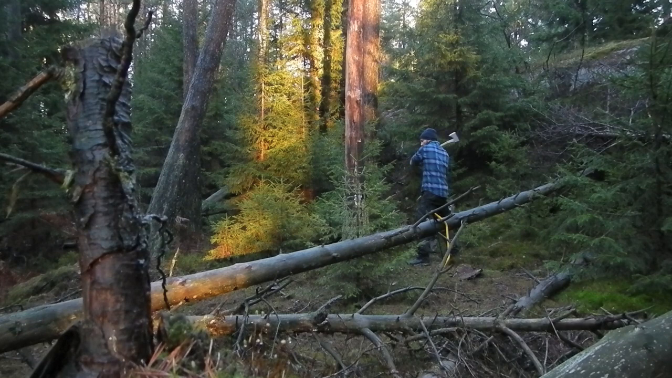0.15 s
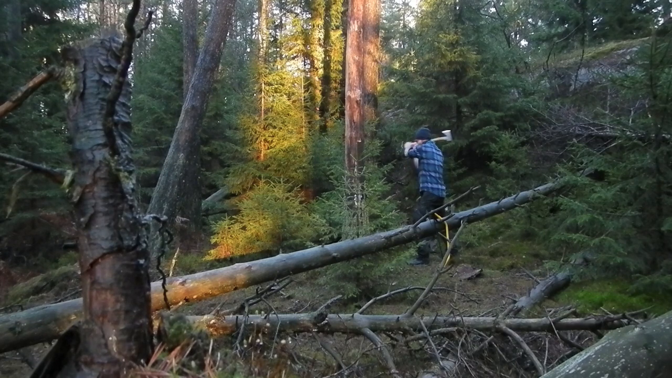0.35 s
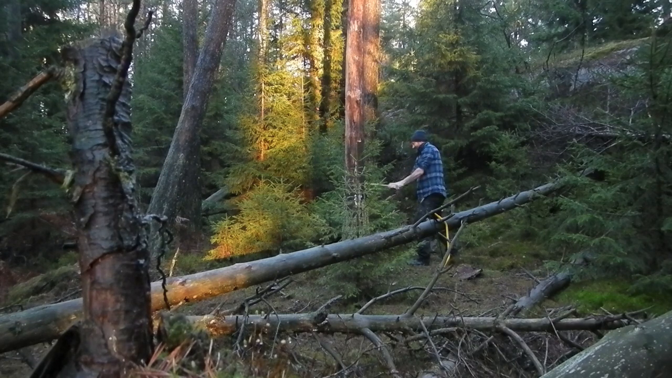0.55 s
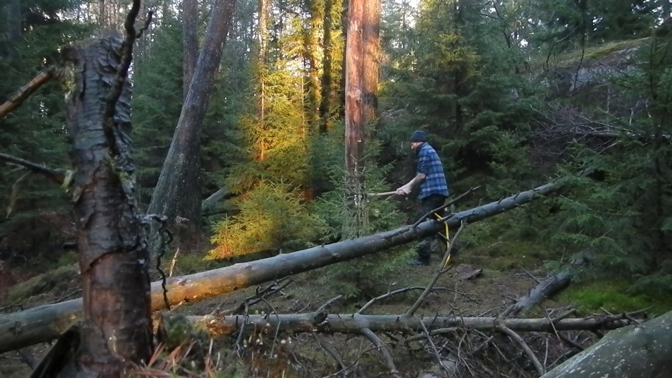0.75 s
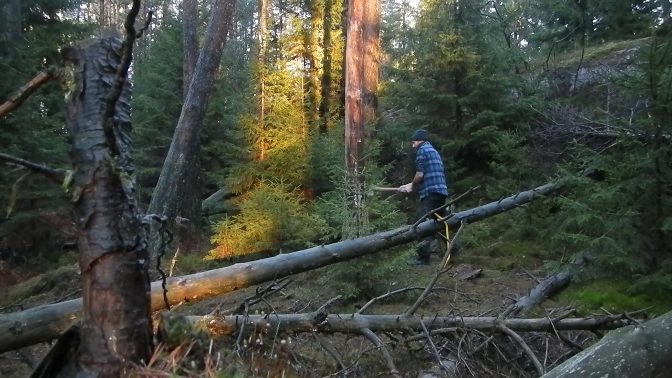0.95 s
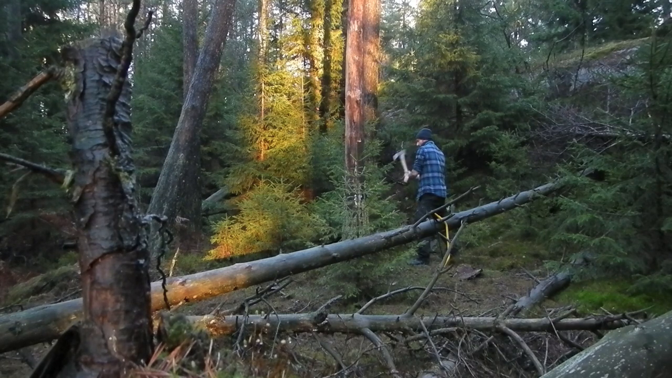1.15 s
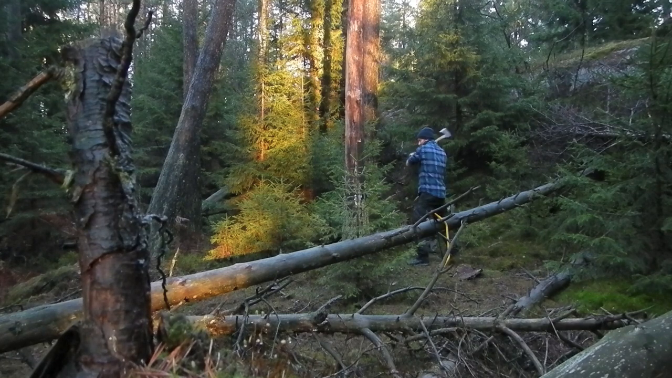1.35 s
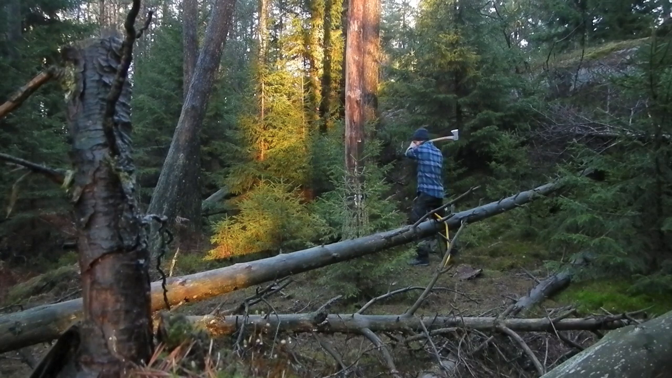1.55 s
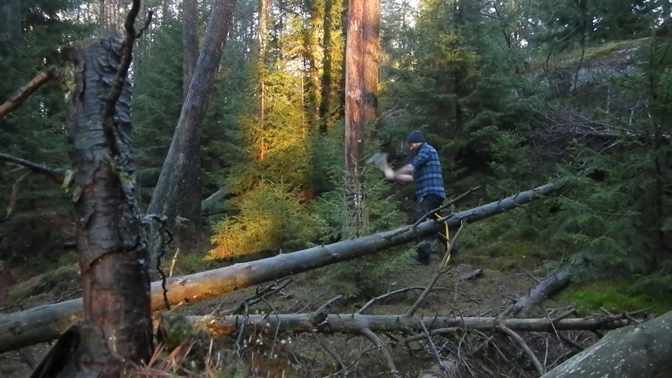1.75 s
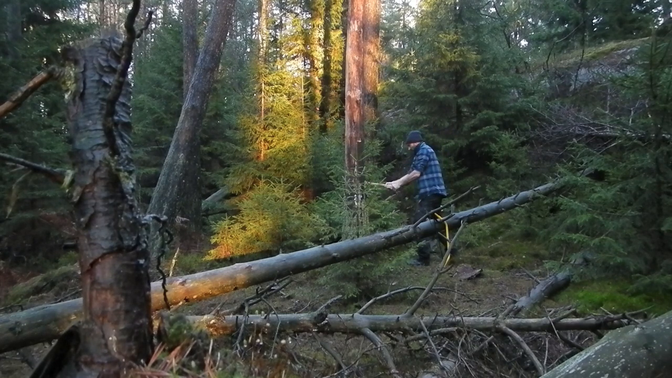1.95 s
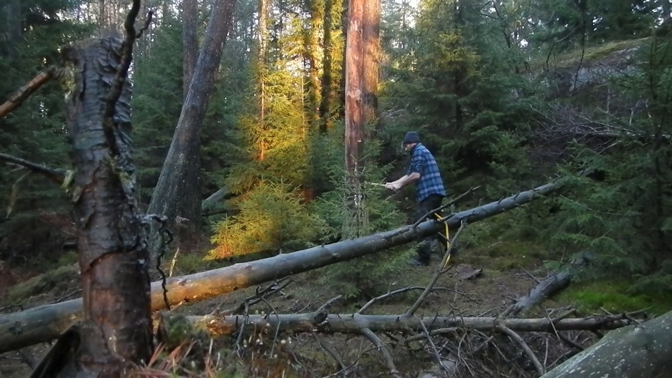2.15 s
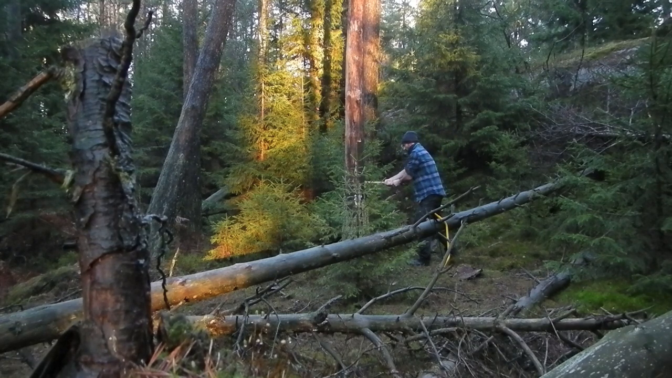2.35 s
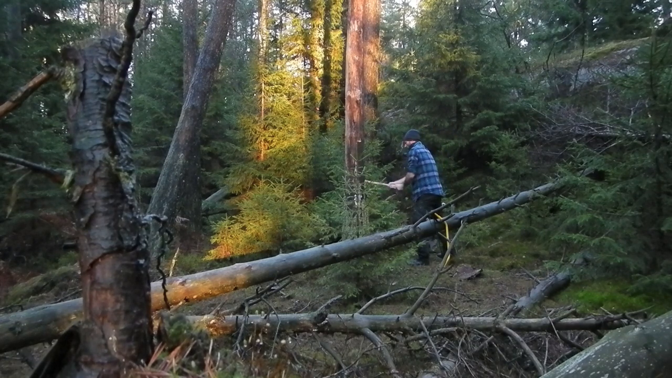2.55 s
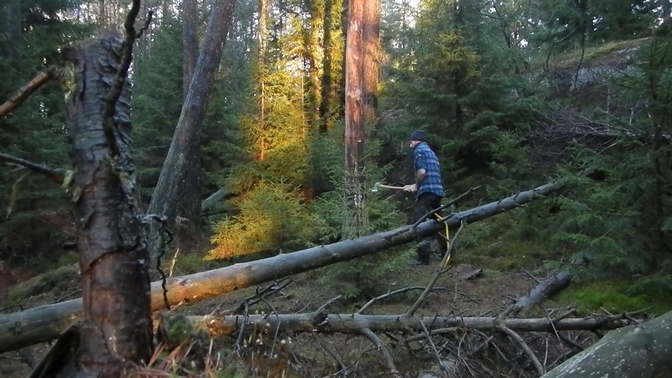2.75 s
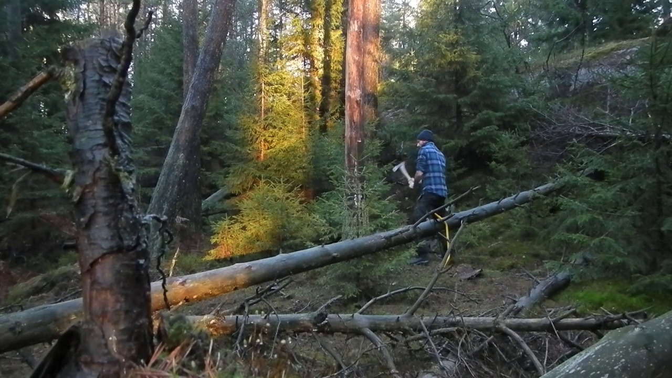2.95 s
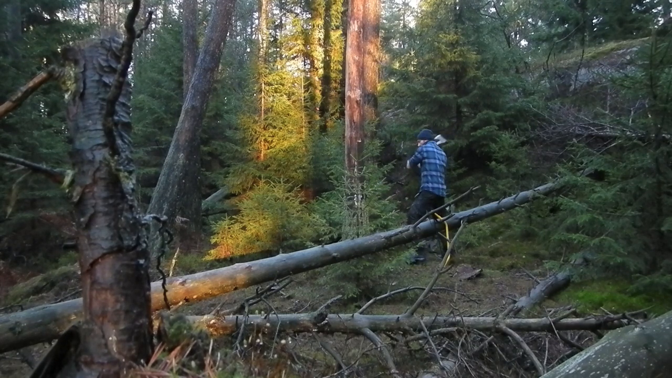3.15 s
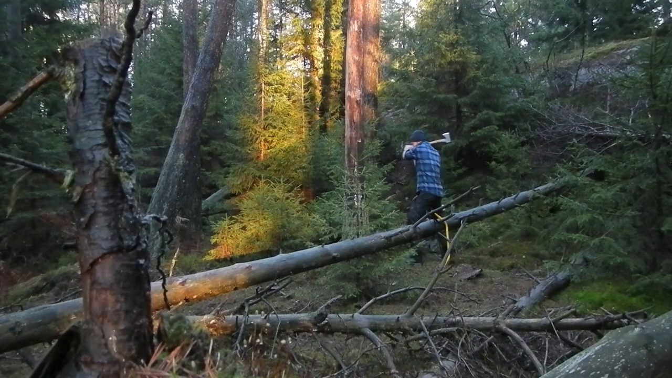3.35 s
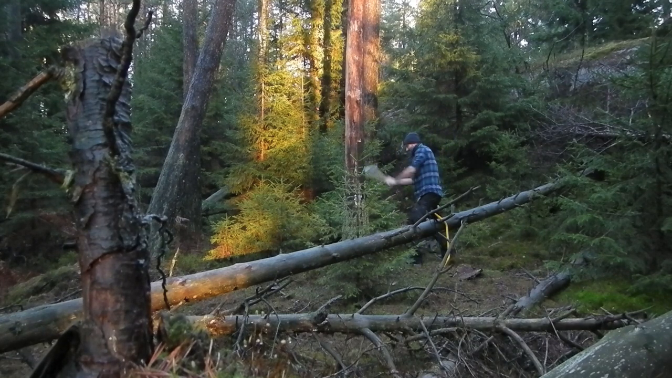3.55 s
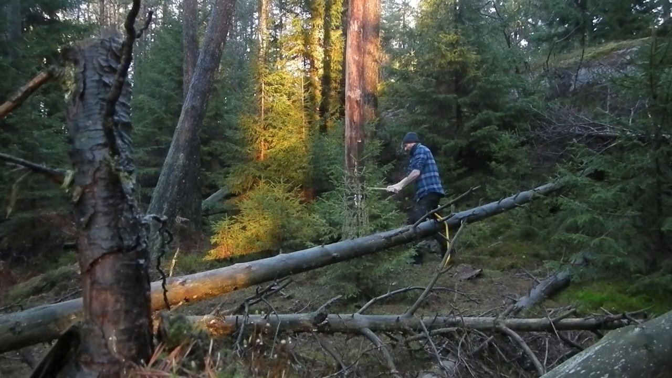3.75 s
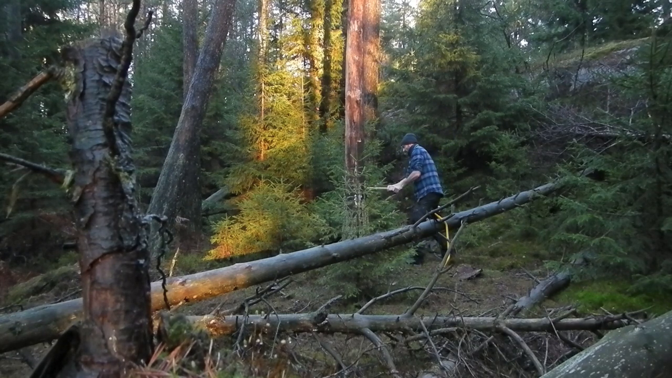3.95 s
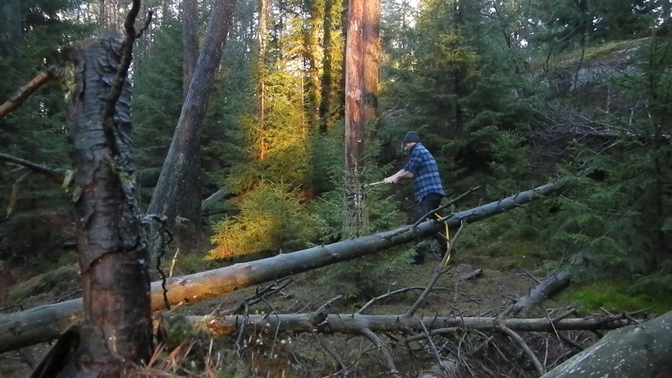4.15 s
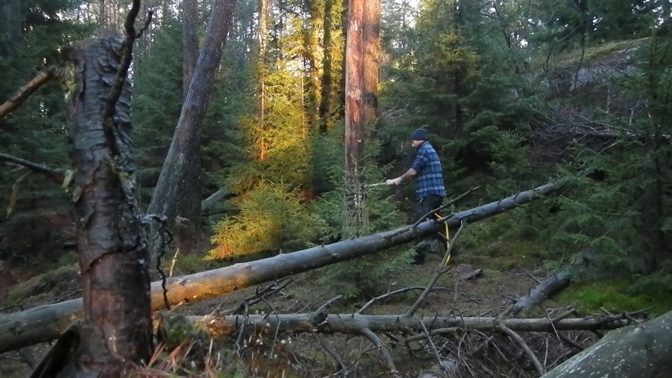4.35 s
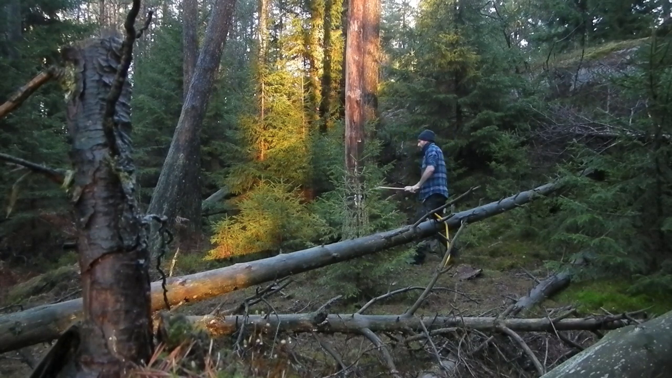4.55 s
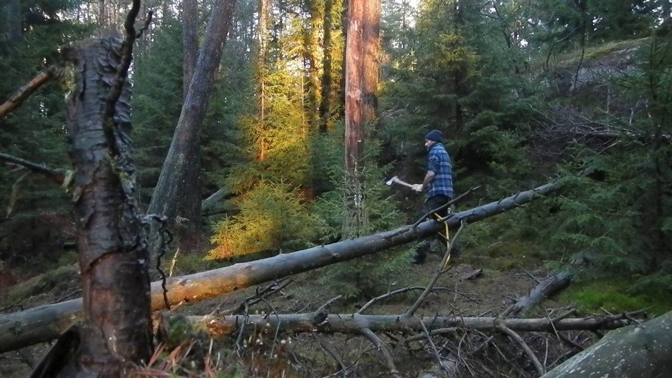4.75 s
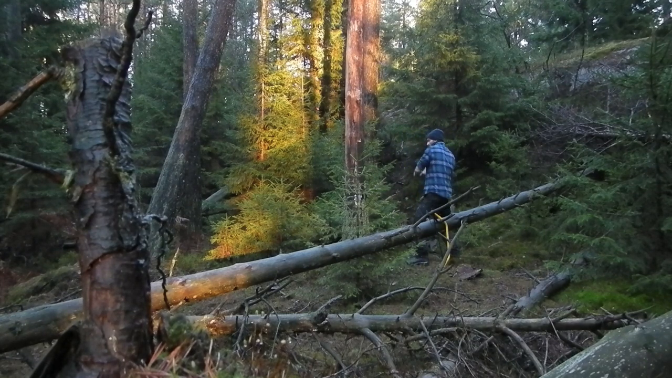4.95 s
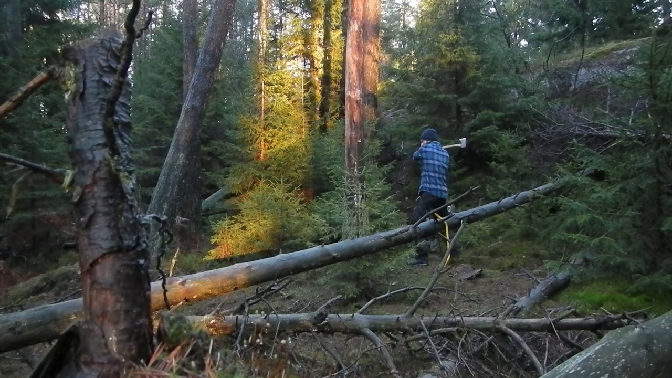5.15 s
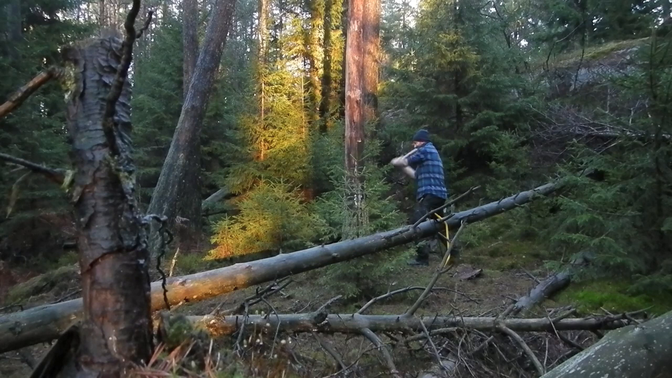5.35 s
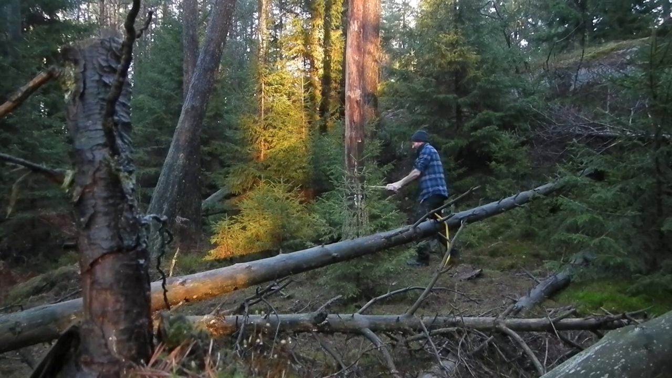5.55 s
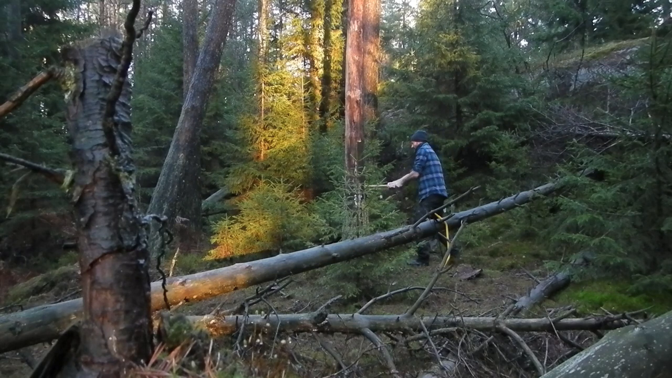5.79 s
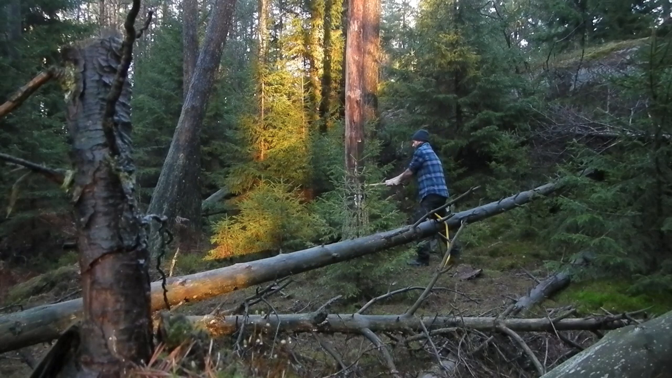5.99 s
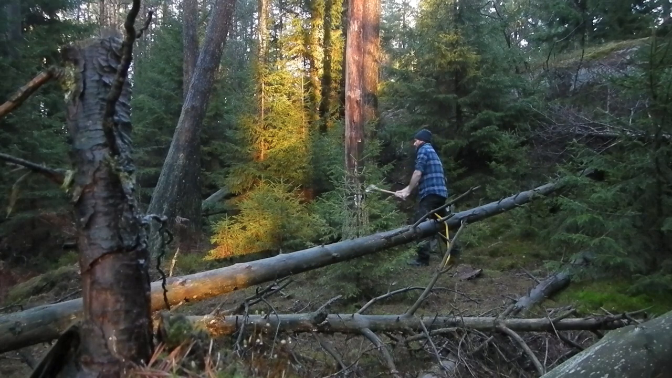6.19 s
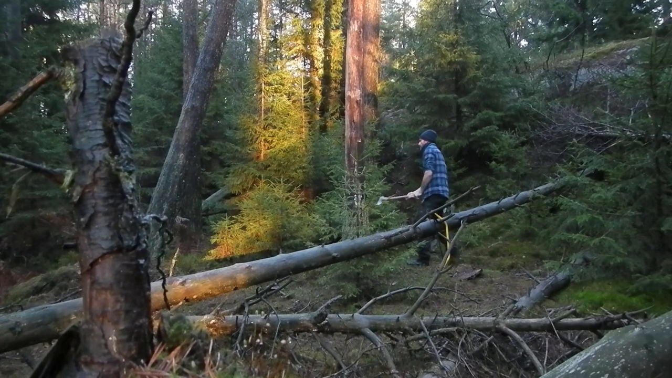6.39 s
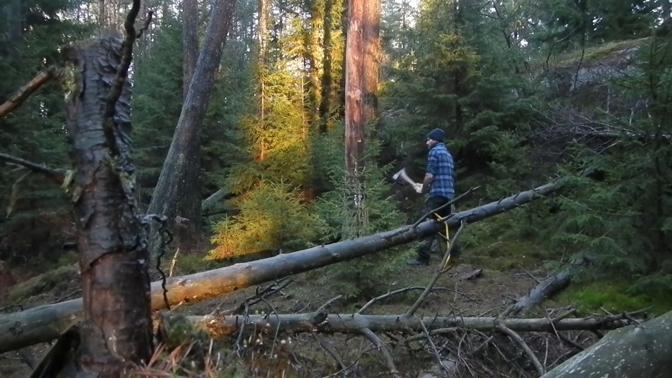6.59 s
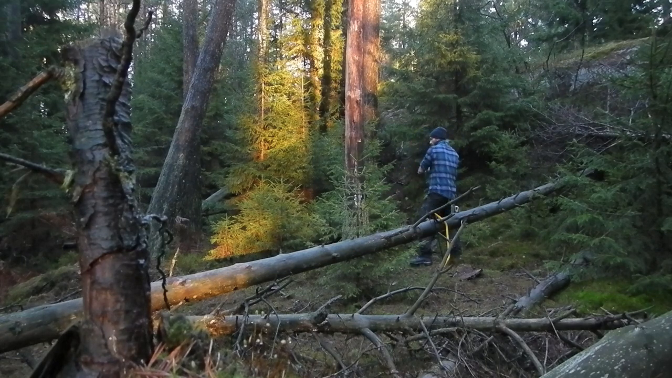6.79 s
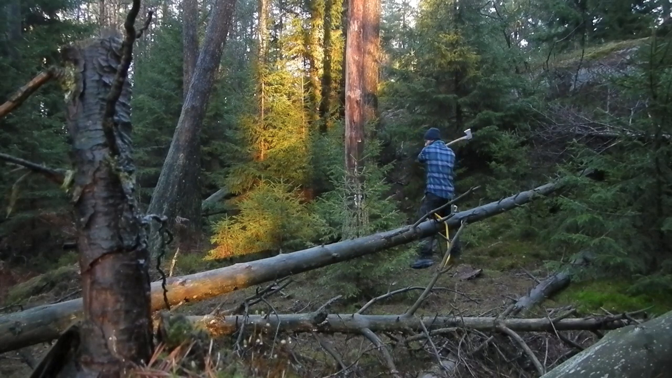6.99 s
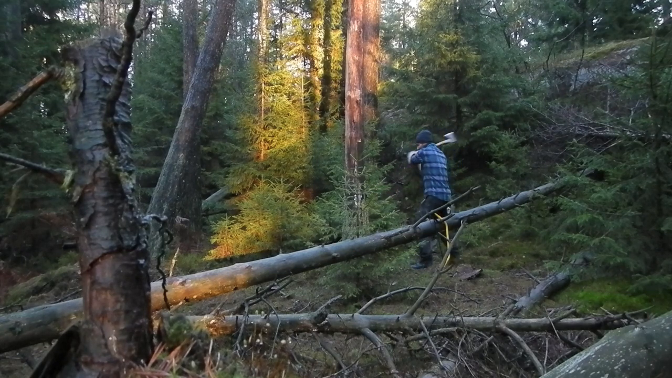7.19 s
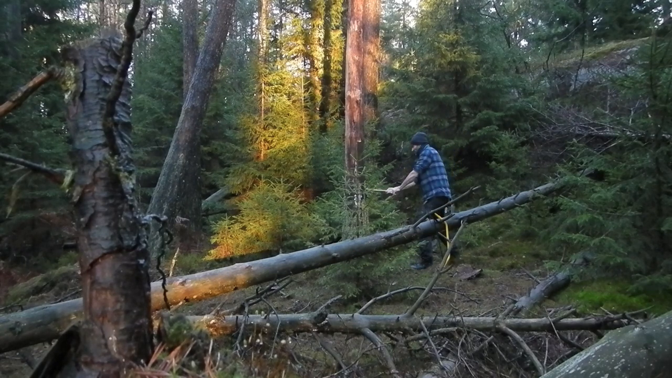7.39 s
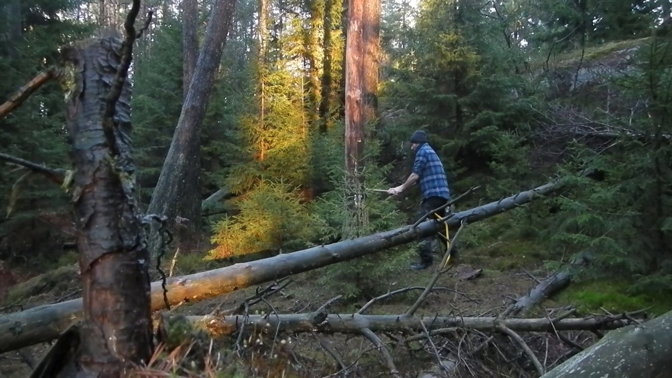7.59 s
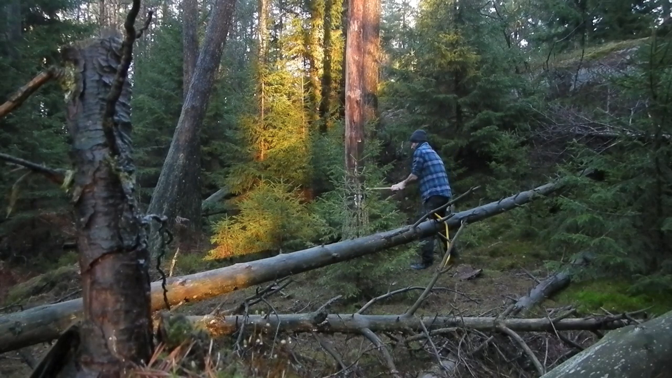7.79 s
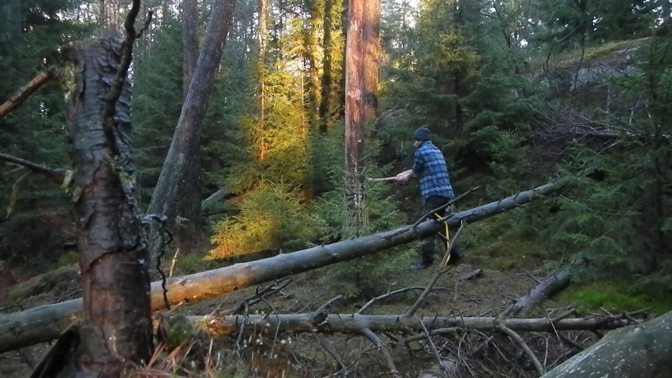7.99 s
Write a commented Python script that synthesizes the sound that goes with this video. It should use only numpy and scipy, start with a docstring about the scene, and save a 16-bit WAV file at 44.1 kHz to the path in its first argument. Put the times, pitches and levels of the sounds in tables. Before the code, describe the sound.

A quiet forest with low airy rumble, steady electronic hiss and a barely noticeable, very high whine. At about 0.55 s an axe hits a dry standing trunk with a loud, sharp crack: a few milliseconds of splintering, short hollow wood tones, a soft low thump and a dense echo dying among trees and slope. Small chips crackle just after, near 0.65 s. Very faint, hoarse rising hoots come from far off around 1.6 and 1.9 s. Further blows fall at 1.8 s, a brighter knock, and 3.6 s, with more distant hoots at 3.2 to 3.5 s. Tiny chip ticks follow. The blow at 5.5 s is strong, deeper and rings longest. The last, at 7.35 s, is somewhat weaker; at 7.76 s the blade creaks out with a tiny squeak leaping upward in pitch, then one faint chip. The work sits slightly left, heard from some distance.

```python
"""Five axe blows on a dry standing trunk in a quiet forest, falling chips, and a squeak as the blade is levered out.
Far away something hoots faintly; steady hiss, a thin whine and low forest air lie under everything.
Wood is a set of dying tones, splinters and chips are shaped noise, and the squeak is a train of slips.
Trunks and slope scatter the sounds as decaying noise; a limiter lowers loud peaks and recovers slowly."""
import sys
import numpy as np
from scipy import signal
from scipy.fft import rfft, irfft, next_fast_len
from scipy.io import wavfile
from scipy.ndimage import uniform_filter1d, minimum_filter1d

SR = 44100
rng = np.random.default_rng(int(sys.argv[2]) if len(sys.argv) > 2 else 0)


def output_pcm(signal):
    """Save a mono or channel-first signal as 16-bit PCM at the path in sys.argv[1].

    Samples are clipped to [-1, 1] before scaling.
    """
    pcm = np.clip(np.atleast_2d(signal).T, -1, 1) * 32767
    wavfile.write(sys.argv[1], SR, np.round(pcm).astype(np.int16))


N = 354123  # length of the scene in samples

# how alike left and right are in echoes and thumps: f/Hz, likeness (1 = identical)
ECHO_LIKENESS = [(100, 0.97), (1000, 0.89), (2500, 0.78), (5000, 0.3), (12000, 0.082)]

# the two lingering groups of trunk tones, and the time they take to fall by 60 dB
RING_HZ, UPPER_RING_HZ, RING_T60_S = 979, 1472, 1.24


def amp(db):
    """Turn decibels into a gain."""
    return 10 ** (np.asarray(db) / 20)


def unit(x):
    """Scale a sound to an rms of 1."""
    return x / np.sqrt(np.mean(x ** 2) + 1e-20)


def fade(t, t60):
    """Die away by 60 dB in t60 seconds."""
    return amp(-60 * t / t60)


def swell(t, rise_s):
    """Rise smoothly from 0 towards 1."""
    return 1 - np.exp(-t / rise_s)


def along(points, hz):
    """Read a (frequency, value) table between its points, on a log frequency axis."""
    f, value = np.transpose(points)
    return np.interp(np.log(hz + 1), np.log(f + 1), value)


def filtered(x, response):
    """Multiply the spectrum of x by a gain that depends on frequency."""
    n = x.shape[-1]
    padded = next_fast_len(n + 8192)
    hz = np.fft.rfftfreq(padded, 1 / SR)
    return irfft(rfft(x, padded) * response(hz), padded)[..., :n]


def coloured(x, spectrum):
    """Shape x by a table of frequency and relative dB, then scale it to rms 1."""
    return unit(filtered(x, lambda hz: amp(along(spectrum, hz))))


def stereo_noise(spectrum, alike, size):
    """Mix a shared and an opposed noise so that left and right are partly alike."""
    def mid_side_gains(hz):
        angle = np.arccos(np.clip(along(alike, hz), -1, 1)) / 2
        return np.array([np.cos(angle), np.sin(angle)])

    mid, side = filtered(rng.standard_normal((2, size)), mid_side_gains)
    return coloured(np.array([mid + side, mid - side]), spectrum)


def add(track, s, sound):
    """Mix a sound into the track at time s, cut off at the track's end."""
    part = track[..., round(s * SR):][..., :sound.shape[-1]]
    part += sound[..., :part.shape[-1]]


def chops(bite_s=0.0034, wood_db=5, cut_db=7.0, splinter_db=-3, ring_db=-25, upper_ring_db=-42,
          thump_db=-26, echo_db=-13):
    """The blade bites for a few milliseconds, splintering fibres and knocking the trunk.

    Every swing wakes the forest alike; the spot it hits sets the share of knock, ring and splinters."""
    # blows, levels relative to the settings above:
    # t/s, knock level/dB, knock f/Hz favoured by the cut, crack f/Hz, ring level/dB, splinter level/dB, thump level/dB
    blows = [(0.55, 1, 1105, 2960, -14, 1, 2), (1.8082, -1.5, 1767, 3160, -16, -4.5, -3.5),
             (3.5984, -1, 1420, 3010, -17, -4.5, 2.5), (5.471, 3, 895, 3280, -5.5, 0, -0.5),
             (7.3497, -5, 1380, 2580, -12.5, -1, 1.5)]
    # tone colour of tearing fibres: f/Hz, relative level/dB
    splinter_spectrum = [(100, -54), (400, -27), (900, -4.5), (2200, 0.5), (3000, 2), (4000, -8),
                         (5200, -8.5), (6200, -19.5), (8000, -27), (10500, -20.5), (13000, -26),
                         (16000, -28)]
    # tone colour of the shaken trunk and ground: f/Hz, relative level/dB
    thump_spectrum = [(28, -30), (50, -7), (100, -0.5), (190, 4), (300, -6.5), (550, -7), (900, -28)]
    # tone colour of the returning wash: f/Hz, relative level/dB
    echo_spectrum = [(100, 2), (400, -8), (700, 0.5), (1000, 2), (1450, -2), (2000, -4), (2800, -6.5),
                     (4000, -13), (5000, -10), (7000, -22.5), (11000, -20.5), (16000, -35)]
    splinter_likeness = [(2500, 0.9), (5000, 0.99), (9000, 0.78)]  # f/Hz, left-right likeness

    out = np.zeros((2, N))
    t = np.arange(SR * 3 // 4) / SR
    bite = np.minimum(t / 0.00083, 1) * fade(np.maximum(t - bite_s, 0), 0.0092)
    for s, knock_db, cut_hz, crack_hz, linger_db, split_db, low_db in blows:
        wood = amp(wood_db + knock_db) * knock(t, cut_hz, cut_db, crack_hz)
        add(out, s, in_forest(wood, near_db=-17, far_db=-23))

        ring = amp(ring_db + linger_db) * trunk_ring(t, RING_T60_S, RING_HZ)
        ring = ring + amp(upper_ring_db) * trunk_ring(t, RING_T60_S, UPPER_RING_HZ)
        splinters = stereo_noise(splinter_spectrum, splinter_likeness, size=len(t)) * bite
        splinters = amp(splinter_db + split_db) * splinters

        # the shaken trunk and the ground rumble on
        thump = stereo_noise(thump_spectrum, ECHO_LIKENESS, size=len(t)) * fade(t, 0.33)
        thump = amp(thump_db + low_db) * thump
        # what the trunk radiates to all other sides comes back as a dense wash
        wash_fade = fade(t, 0.094) + amp(-12.5) * fade(t, 0.49)
        wash = amp(echo_db) * stereo_noise(echo_spectrum, ECHO_LIKENESS, size=len(t)) * wash_fade
        add(out, s, splinters + ring + (thump + wash) * swell(t, 0.0016))
    return out


def knock(t, cut_hz, cut_db, crack_hz, crack_db=5, reach_hz=190, swell_s=0.00096):
    """The trunk sounds as dying tones; the place and depth of the cut favour two groups of them."""
    # tones of dry wood before small random changes: f/Hz, level/dB, time to fall by 60 dB/s
    wood_modes = [(165, -20.5, 0.04), (573, -9.5, 0.024), (820, -18.5, 0.0092), (808, -12.5, 0.02),
                  (951, -7.5, 0.042), (1148, -12.5, 0.018), (1297, -11.5, 0.037), (1493, -8.5, 0.018),
                  (1633, -9, 0.032), (1835, -2.5, 0.012), (1829, -6, 0.027), (1994, -3.5, 0.0078),
                  (2586, -6, 0.016), (2939, -5.5, 0.018), (3152, -11, 0.025), (3343, -12.5, 0.023),
                  (5206, -18, 0.012)]
    out = np.zeros(len(t))
    for k, (hz, db, t60) in enumerate(wood_modes):
        detune, spread_db = rng.standard_normal(2)
        lift_db = cut_db * np.exp(-((hz - cut_hz) / reach_hz) ** 2)
        lift_db += crack_db * np.exp(-((hz - crack_hz) / reach_hz) ** 2)
        level = amp(db + lift_db + 0.28 * spread_db)
        tone = np.sin(2 * np.pi * hz * (1 + 0.019 * detune) * t)
        # neighbouring modes start in opposite directions, so the closely spaced deep ones build up last
        out += (-1) ** k * level * fade(t, t60) * tone
    return out * (1 - np.exp(-(t / swell_s) ** 2))


def trunk_ring(t, t60, hz, width_hz=50):
    """A group of close tones, made from narrow noise, lingers and flutters."""
    cluster = filtered(rng.standard_normal(len(t)), lambda f: 1 / (1 + ((f - hz) / width_hz) ** 2))
    return unit(cluster) * fade(t, t60) * swell(t, 0.0018)


def in_forest(sound, near_db, far_db, near_t60=0.13):
    """Add quick scatter from ground and close trunks, and a longer answer of the wood beyond."""
    # tone colour of the scattered sound: f/Hz, relative level/dB
    scatter_spectrum = [(40, 10), (130, 8.5), (300, 3.5), (550, -1.5), (1000, -5), (2000, 1.5),
                        (3000, -6.5), (5000, 10.5), (11000, -0.5)]
    # how long the far wood answers: f/Hz, time to fall by 60 dB/s
    forest_t60 = [(60, 0.53), (250, 0.93), (1000, 1), (2500, 1), (6000, 0.91), (12000, 0.11)]

    t = np.arange(SR) / SR
    # the far answer dies away at a different speed in each frequency band
    far_noise = stereo_noise(scatter_spectrum, ECHO_LIKENESS, size=SR)
    hz, when, bands = signal.stft(far_noise, SR, nperseg=256)
    bands = bands * fade(when, along(forest_t60, hz)[:, None])
    far = signal.istft(bands, SR, nperseg=256)[1][:, :SR] * swell(t, 0.018)
    near = stereo_noise(scatter_spectrum, ECHO_LIKENESS, size=SR) * fade(t, near_t60) * swell(t, 0.0047)

    paths = amp(near_db) * near / np.linalg.norm(near[0]) + amp(far_db) * far / np.linalg.norm(far[0])
    paths[:, 0] += 1  # the direct sound
    return signal.fftconvolve(sound[None], paths, axes=1)


def squeak(level_db=0, ring_db=-44):
    """Steel sticks and slips in the cut: a creak that jumps an octave and sets the trunk ringing."""
    # blade slipping out of the cut: t/s, slips per second (before the octave jump doubles them)
    slip_rates = [(7.7617, 270), (7.775, 520), (7.788, 477), (7.803, 540), (7.815, 595), (7.823, 470),
                  (7.848, 445), (7.869, 490)]
    # how hard the blade rubs: t/s, level/dB
    rub_levels = [(7.761, -28), (7.775, -23.5), (7.833, -29.5), (7.847, -40), (7.867, -33.5), (7.885, -53)]
    # tone colour of the rubbing: f/Hz, relative level/dB
    squeak_spectrum = [(250, -17), (520, -6.5), (760, -10), (990, 6.5), (1200, -16), (1500, 4.5),
                       (2100, 0.5), (2600, -1), (3200, 3), (4200, -22), (5600, -19.5), (8000, -30),
                       (15000, -32)]
    octave_jump_s = 7.8  # from here on the blade slips twice as often
    jitter, rasp_db = .022, -11  # unevenness of the slips as a share; noise beside them

    start = slip_rates[0][0]
    t = np.arange(SR // 2) / SR
    rate = np.interp(start + t, *np.transpose(slip_rates))
    rate = rate * np.where(start + t < octave_jump_s, 1, 2)
    rub_db = np.interp(start + t, *np.transpose(rub_levels), right=-120)

    # one click each time the running count of slips passes a whole number
    wander = unit(uniform_filter1d(rng.standard_normal(len(t)), size=60))
    slip_count = np.cumsum(rate * (1 + jitter * wander)) / SR
    slips = np.diff(np.floor(slip_count), prepend=-1)
    slips = (slips - rate / SR) * np.sqrt(rate.mean() / rate)  # faster slips are smaller
    slips = signal.lfilter([-.85, 1], [1, -.85], slips)  # the wood smears each slip

    rasp = amp(rasp_db) * coloured(rng.standard_normal(len(t)), squeak_spectrum)
    rub = coloured(slips, squeak_spectrum) + rasp
    sound = rub * amp(level_db + rub_db) + amp(ring_db) * trunk_ring(t, RING_T60_S, RING_HZ)
    out = np.zeros((2, N))
    add(out, start, in_forest(sound, near_db=-12, far_db=-15))
    return out


def chips(level_db=1, t60=0.02):
    """Each chip or twig lands with a short gritty crackle of spiky noise."""
    # bark chips and twigs: t/s, level/dB relative to level_db
    landings = [(0.639, -23), (.662, -23.5), (2.2366, -36.5), (2.265, -33.5), (4.019, -39), (4.0443, -39),
                (4.9042, -42), (5.769, -38.5), (7.944, -38)]
    # tone colour of a landing: f/Hz, relative level/dB
    chip_spectrum = [(150, -7), (1000, 5), (3000, 4), (5000, -7), (8000, -15), (12000, -10), (16000, -39)]
    out = np.zeros((2, N))
    t = np.arange(SR // 8) / SR
    for s, db in landings:
        grit = coloured(rng.laplace(size=len(t)), chip_spectrum)
        crackle = grit * amp(db + level_db) * fade(t, t60)
        add(out, s, in_forest(crackle, near_db=-3, far_db=-17))
    return out


def hoots(level_db=-4, far_db=-2):
    """Faint, slightly hoarse rising tones from far off, smeared by the trees."""
    # far hoots: t/s, starting f/Hz before the hoarse wobble, level/dB relative to level_db
    calls = [(1.545, 459, -44), (1.575, 534, -37), (1.605, 666, -42.5), (1.91, 651, -37), (3.17, 525, -37),
             (3.225, 697, -42.5), (3.485, 525, -44.5), (3.5, 628, -40)]
    hoot_s, rise = 0.071, 0.077  # length of a hoot; share by which its pitch rises
    out = np.zeros((2, N))
    u = np.linspace(0, 1, int(hoot_s * SR))  # progress through one hoot
    for s, hz, db in calls:
        pitch = hz * (1 + rise * np.sin(np.pi * u / 2))
        wobble = unit(uniform_filter1d(rng.standard_normal(len(u)), size=120))
        pitch = pitch * (1 + .04 * wobble)
        tone = np.sin(2 * np.pi * np.cumsum(pitch) / SR) * np.sin(np.pi * u)
        add(out, s, in_forest(amp(db + level_db) * tone, near_db=-9, far_db=far_db))
    return out


def background(hiss_db=-47, rumble_db=-57.0, whine_hz=14835.3, whine_db=-57.5):
    """Low forest air as deep noise, under the steady hiss and thin whine of the electronics."""
    # tone colour of the hiss: f/Hz, relative level/dB
    hiss_spectrum = [(410, -29), (700, -17), (830, -15.5), (1020, -7.5), (1350, -11), (1550, -18.5),
                     (1730, -17), (1870, -6), (2190, -4), (2490, -5.5), (2800, -18.5), (3370, -18),
                     (4050, -15), (5610, -25), (7200, -18.5), (9730, -28.5), (11800, -27), (13700, -34.5),
                     (15500, -67)]
    # tone colour of the low air: f/Hz, relative level/dB
    rumble_spectrum = [(12, -31), (20, -10.5), (75, -2), (140, -2), (312, -5), (418, -6.5), (466, -7),
                       (579, -7.5), (800, -12.5), (1040, -36.5), (1760, -120)]
    # how alike left and right are: f/Hz, likeness (1 = identical)
    likeness = [(60, 0.64), (120, 0.27), (240, 0.24), (480, 0.15), (950, 0.34), (1890, 0.87), (3770, 0.33),
                (7520, 0.2), (15000, 0.28)]
    hiss = amp(hiss_db) * stereo_noise(hiss_spectrum, likeness, size=N)
    rumble = amp(rumble_db) * stereo_noise(rumble_spectrum, likeness, size=N)
    whine = amp(whine_db) * np.sin(2 * np.pi * whine_hz * np.arange(N) / SR)
    return hiss + rumble + whine


def scene():
    """The work at the tree, a little to the left, over the sounds of the place."""
    # the tree stands a little to the left: f/Hz, level/dB added left and taken right
    lean = [(30, .3), (120, 1.1), (500, 1.2), (1500, 1), (4000, -.1), (12000, -.2)]
    left_right = np.array([[1], [-1]])
    work = chops() + chips() + squeak()
    work = filtered(work, lambda hz: amp(along(lean, hz) * left_right))
    return work + hoots() + background()


def record(dry, recovery_db=16):
    """A limiter clamps each peak and gives back recovery_db each second; then the top treble is cut."""
    ceiling, top_hz = .85, 16200  # highest level let through; nothing passes above top_hz
    over_db = 20 * np.log10(np.maximum(np.abs(dry).max(axis=0) / ceiling, 1))
    release = recovery_db * np.arange(N) / SR
    gain_db = release - np.maximum.accumulate(over_db + release)
    # start turning down a few samples early, and round off the steps
    gain_db = uniform_filter1d(minimum_filter1d(gain_db, size=15), size=15)
    return filtered(dry * amp(gain_db), lambda hz: np.clip((top_hz - hz) / 900, 0, 1))


dry = scene()
out = record(dry)
output_pcm(out)
```